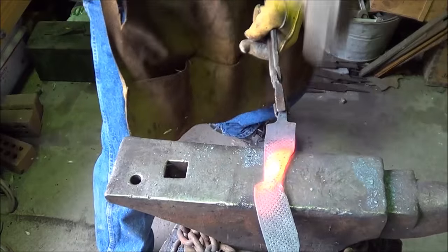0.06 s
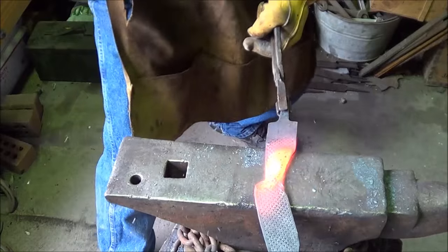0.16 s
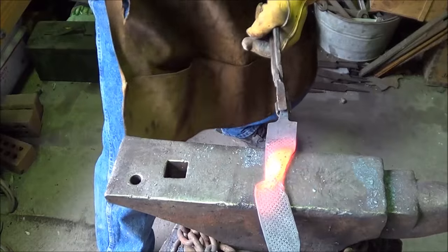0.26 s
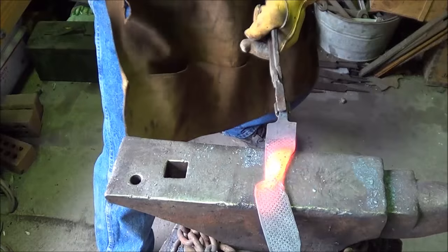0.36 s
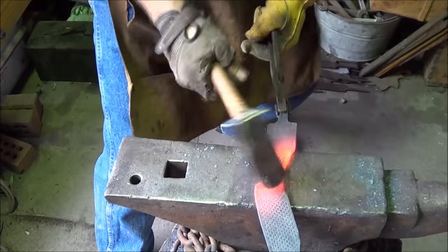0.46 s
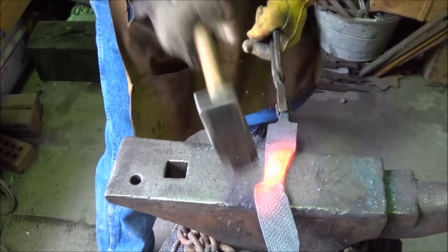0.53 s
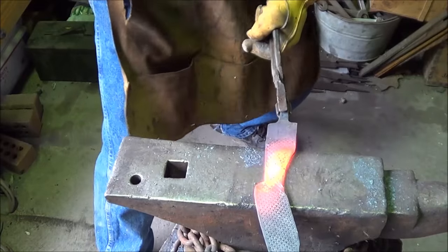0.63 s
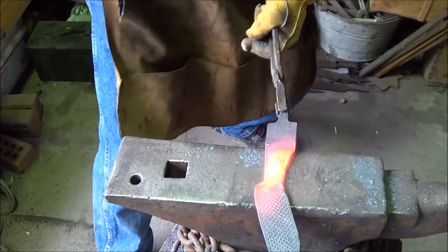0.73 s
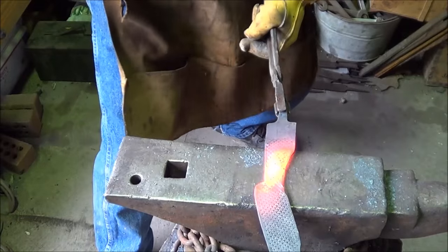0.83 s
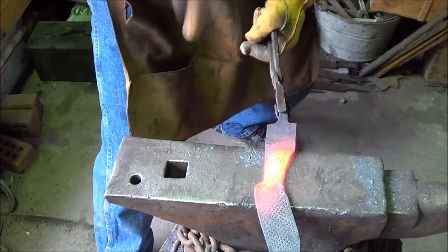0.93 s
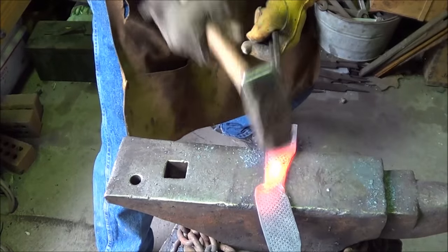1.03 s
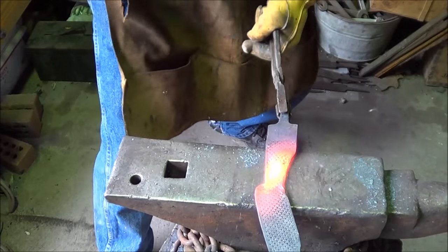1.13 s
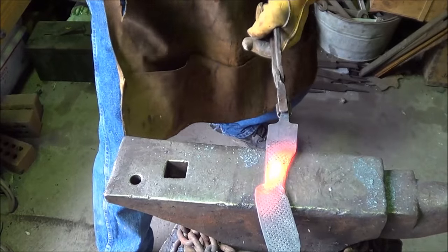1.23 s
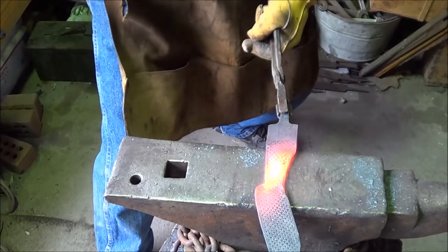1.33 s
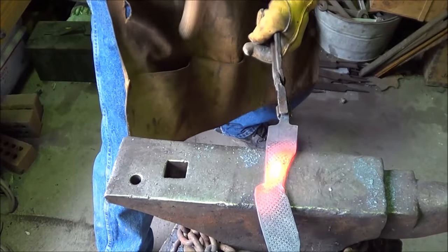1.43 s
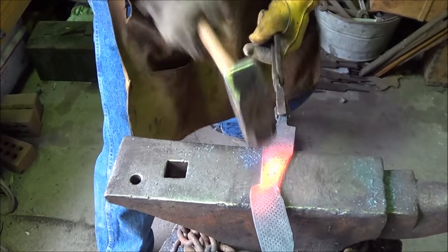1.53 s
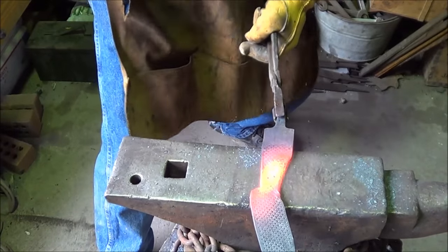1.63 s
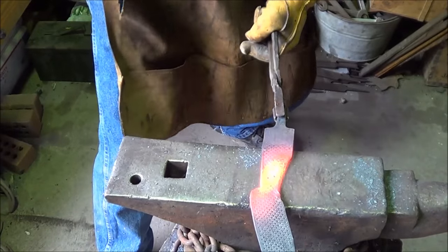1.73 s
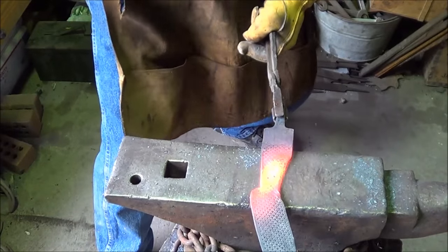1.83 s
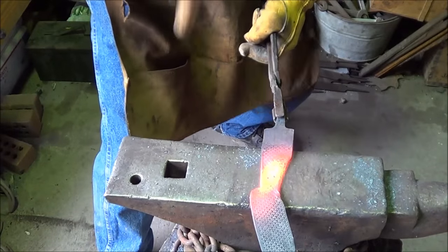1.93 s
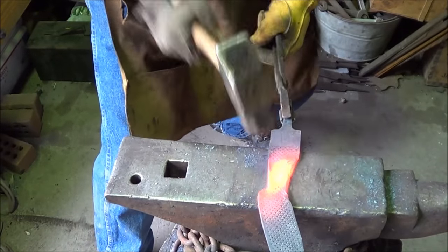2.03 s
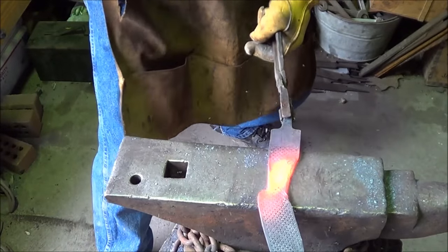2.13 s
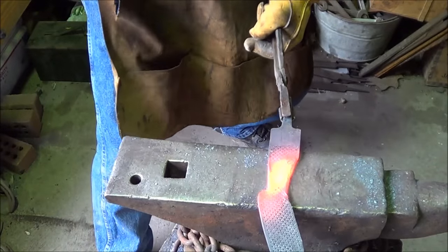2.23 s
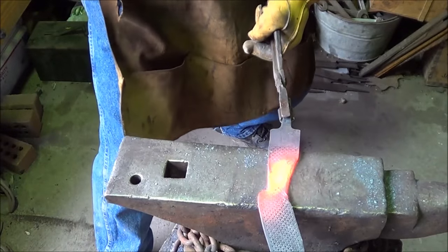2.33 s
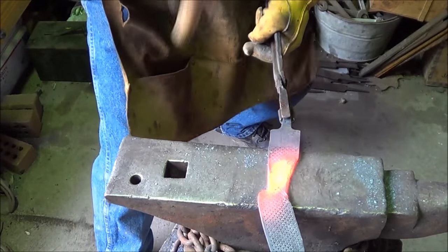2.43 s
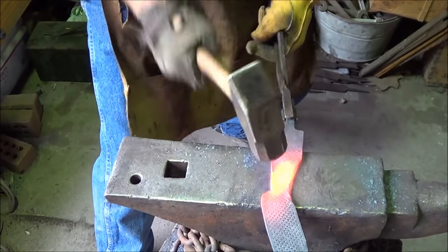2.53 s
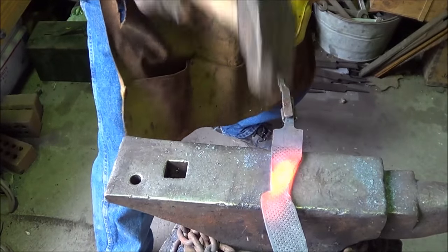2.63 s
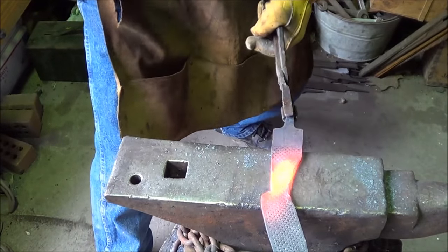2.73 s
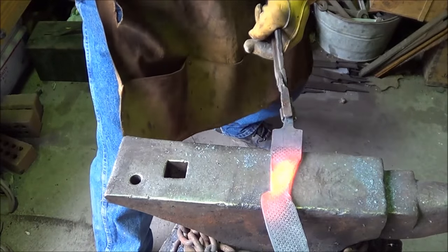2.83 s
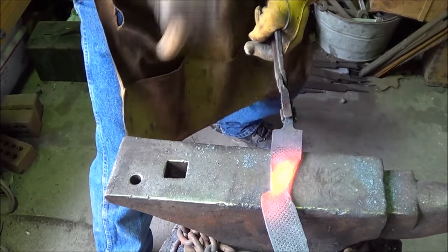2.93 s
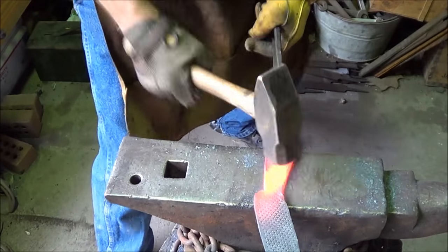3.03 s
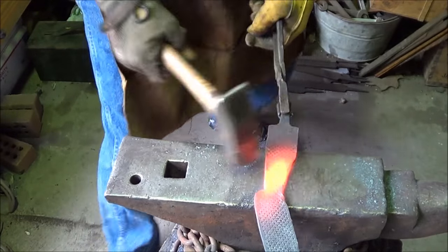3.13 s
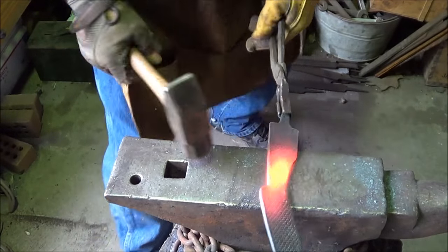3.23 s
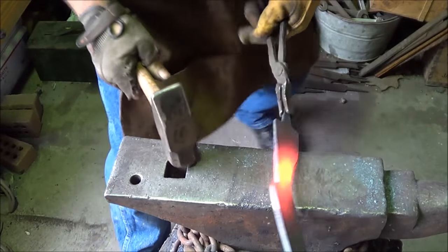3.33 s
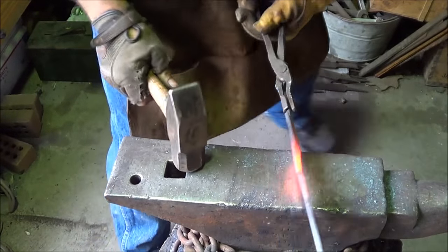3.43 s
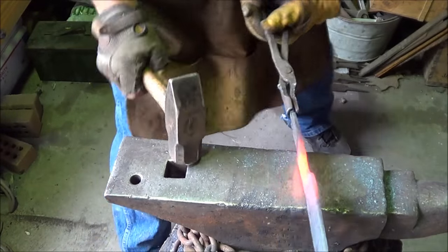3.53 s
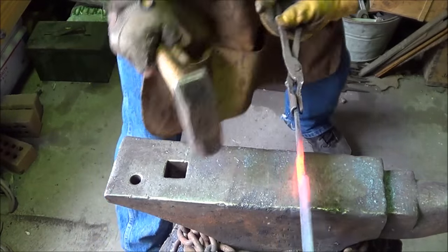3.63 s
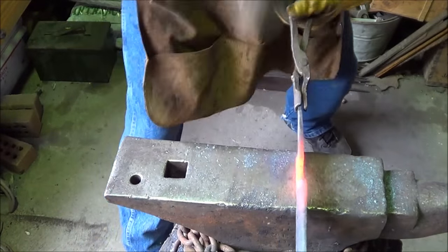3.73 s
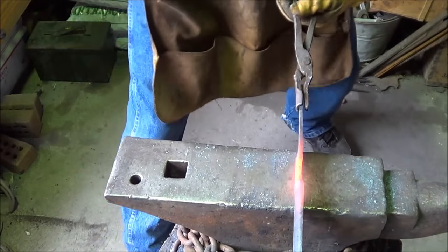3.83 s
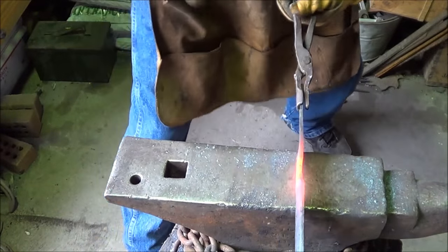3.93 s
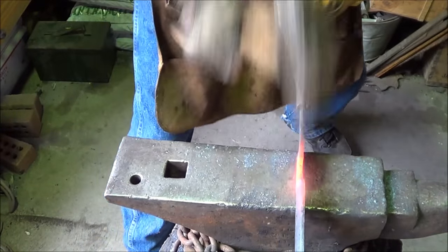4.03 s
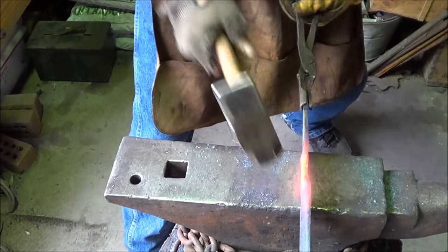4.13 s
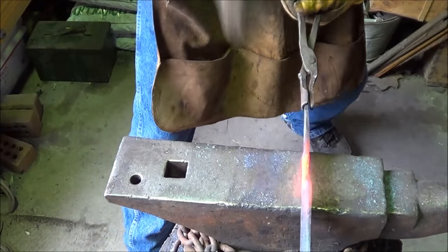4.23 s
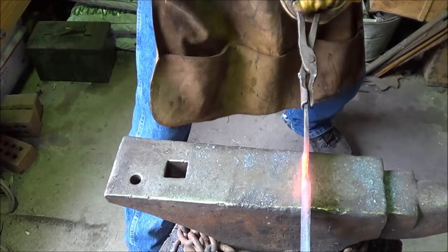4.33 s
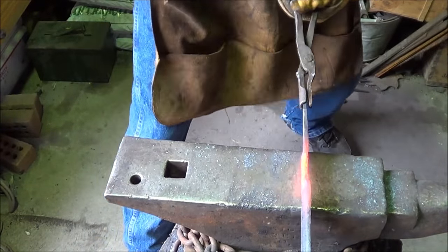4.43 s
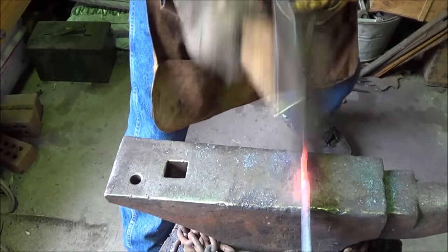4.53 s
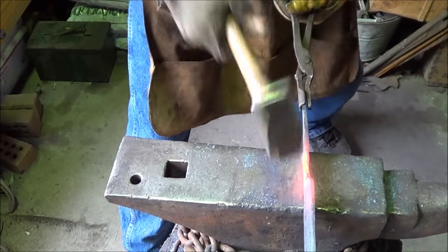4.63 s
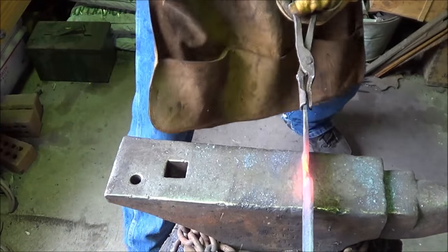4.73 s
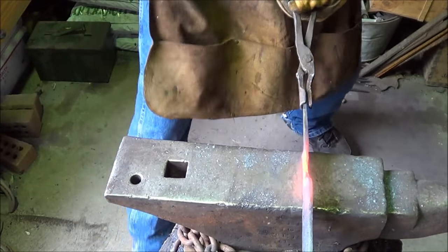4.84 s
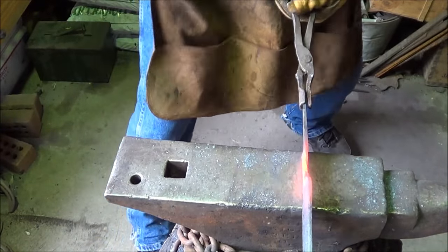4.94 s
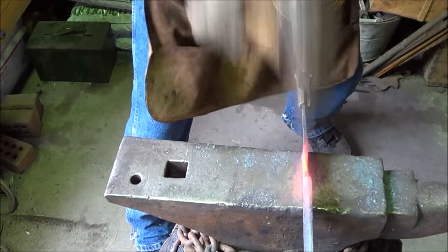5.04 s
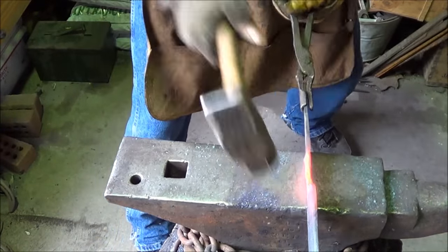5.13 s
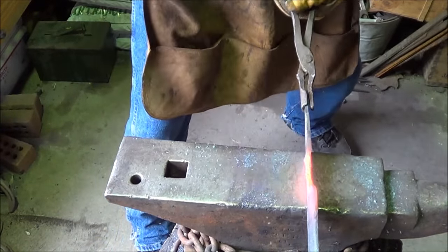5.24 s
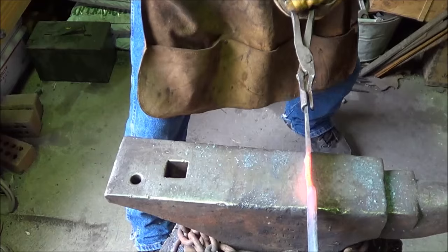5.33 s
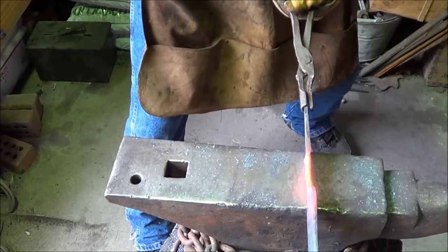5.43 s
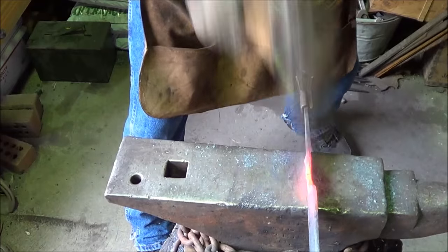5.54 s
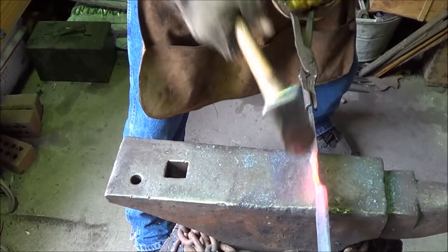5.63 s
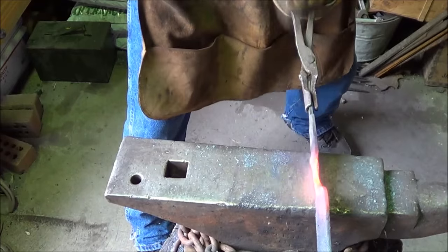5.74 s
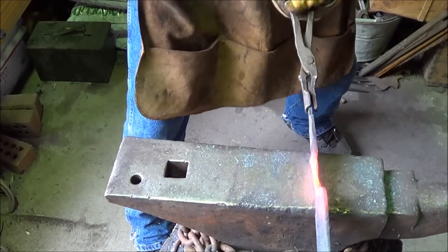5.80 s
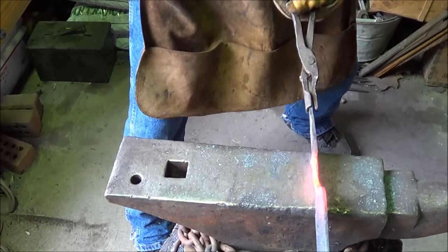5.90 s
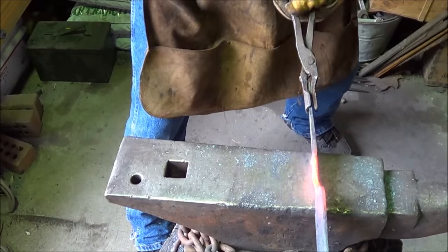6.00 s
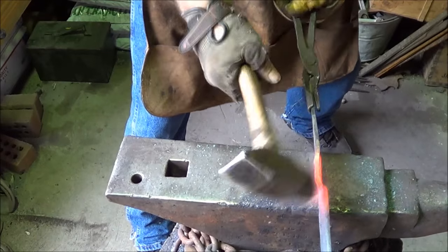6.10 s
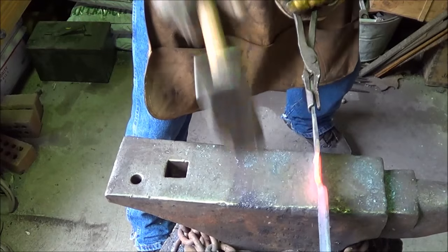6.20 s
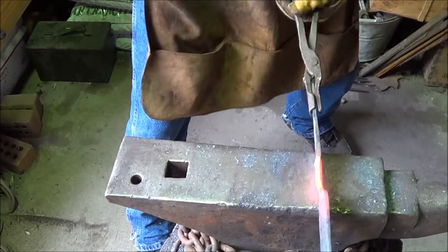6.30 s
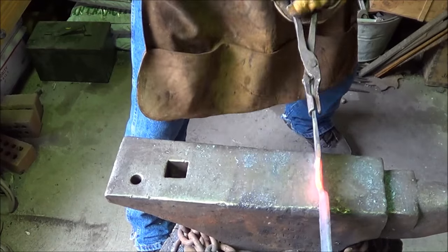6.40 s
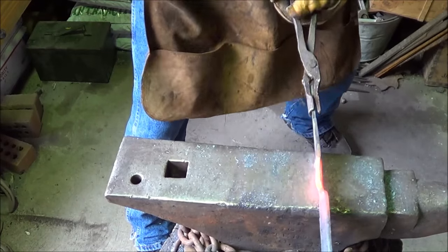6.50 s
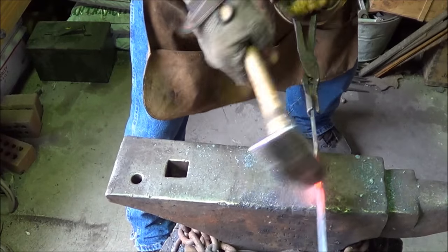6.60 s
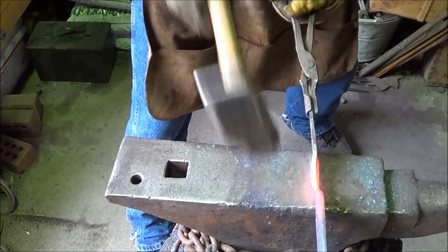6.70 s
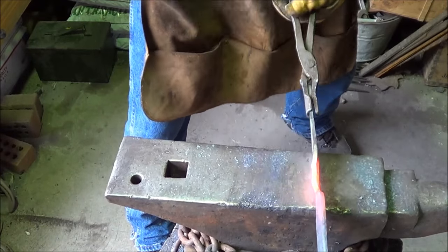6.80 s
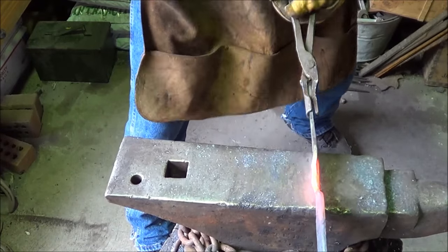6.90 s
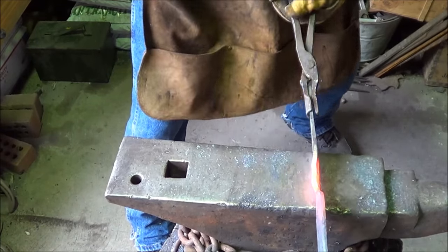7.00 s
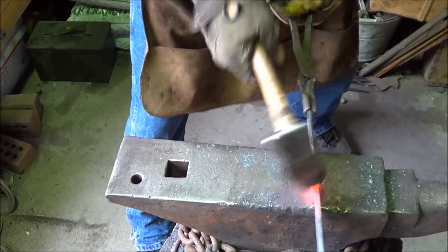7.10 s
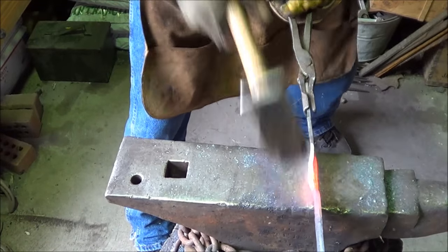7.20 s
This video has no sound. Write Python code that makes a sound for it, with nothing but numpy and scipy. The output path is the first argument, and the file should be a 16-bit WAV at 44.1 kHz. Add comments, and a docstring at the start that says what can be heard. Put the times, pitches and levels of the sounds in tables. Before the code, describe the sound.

A hammer strikes a hot steel bar on an anvil from the very start, close by, about two blows a second. Seven blows land up to about 3 seconds, the first ones thudding, the later ones clanging briefly, with a thin, very high ring from the hammer head that wavers in pitch. Just before 3 seconds a flake of scale ticks on the floor and a shoe scuffs. At 3.2 seconds the bar clinks as it is turned, and around 3.4 the hammer bounces lightly on the bare anvil. From 4.1 to about 7.2 seconds seven more blows land at the same pace, again going from thud to a sharp, short clang. A shoe scuffs softly near 5 seconds. The dull, steady rush of a forge runs underneath throughout, and the small workshop adds a short reverberation to each hit.

```python
"""A smith forges a hot steel bar on an anvil, two blows a second, over the rush of a small workshop's forge.
Seven blows land on the flat; as the bar beds down, the thud gives way to a brief clang, and the hammer
head sings on, bending in pitch as it swings past the microphone. Shoes scuff and scale ticks on the floor.
The bar clinks as it is turned and the hammer bounces on the bare face. Then seven blows land on the edge,
again going from thud to clang. A limiter flattens each blow."""
import sys
import numpy as np
from scipy import signal
from scipy.io import wavfile
from scipy.ndimage import uniform_filter1d, minimum_filter1d

SR = 44100
rng = np.random.default_rng(int(sys.argv[2]) if len(sys.argv) > 2 else 0)


def wav_out(sig):
    """Save sig, one row per channel (or a flat mono array), as 16-bit PCM at SR to the path in sys.argv[1]."""
    wavfile.write(sys.argv[1], SR, np.round(np.clip(np.atleast_2d(sig).T, -1, 1) * 32767).astype(np.int16))


N = 320166
TIME = np.arange(N) / SR
TAIL = TIME[:SR]   # one second for a sound to die away
EDGES = 28 * 2 ** (np.arange(24) / 2.5)   # filter bank, Hz
CENTRES = np.sqrt(EDGES[1:] * EDGES[:-1])


# Hammer on the hot bar. Firmness (0-1) trades thud for clack and ring; the spot hit colours the ring:
# start_s, force_db, firmness, tilt_db_per_octave, overtone_db, hammer_ring_db
BAR_BLOWS = [(0.0, -13.5, 0.28, -5, -6, -23.5), (0.5155, -8.5, 0.14, 0.5, -3, -11.5),
             (1.0334, -10, 0.64, -7.5, 8.5, -7.5), (1.5372, -14.5, .6, -3, -7, -4),
             (2.0396, -14, 0.81, 0, 9, 1.5), (2.5458, -13.5, 0.89, 0, -5, -4),
             (3.049, -17, 0.88, -1.5, -16, -12.5), (4.1181, -20.5, 0.4, -1.5, 1, -24.5),
             (4.608, -18.5, 0.36, 9, -13, -20), (5.1171, -16.5, 0.82, 6, -10, -12.5),
             (5.62, -15, 0.82, 2, 1.5, -19.5), (6.1328, -15, 0.97, -0.5, 2, -19),
             (6.647, -14, 1, 0.5, 3, -18.5), (7.158, -15, 0.94, 0, -8, -8.5)]
# The hammer is set down on the bare face and bounces: start_s, force_db, firmness
HAMMER_TAPS = [(3.3682, -30.5, 0.79), (3.4305, -31, 0.51), (3.464, -43, 0.2)]
# The bar knocks on the anvil as it is turned: start_s, force_db, firmness
TURN_KNOCKS = [(3.2349, -27, 0.38)]

def contacts():
    """Every hit on the anvil: start_s, force_db, firmness, tilt_db_per_octave, overtone_db, kind."""
    blows = [(*row[:-1], pose(row[0])) for row in BAR_BLOWS]
    return blows + [(*row, 0, 0, "bare") for row in HAMMER_TAPS + TURN_KNOCKS]


def pose(s, turn_s=3.7):
    """The bar lies flat until it is turned, then stands on edge."""
    return "flat" if s < turn_s else "edge"


# Tone of hammer, bar, anvil and stand colliding: freq_hz, density_db
IMPACT_TONE = [(40, -45), (80, -6), (130, -7), (200, 0), (310, 0.5), (530, 0), (780, -5.5), (1200, -4),
               (2000, -9), (3000, -12.5), (5000, -12), (8000, -6), (11500, -6.5), (15500, -30)]
# Where each part of the hit sits: boom_hz, thud_hz, knock_hz, clack_hz, crack_hz
HIT_ZONES = [70, 220, 1000, 1730, 7000]
# EQ of a loose hit, by kind of contact: boom_db, thud_db, knock_db, clack_db, crack_db
LOOSE_EQ = {"flat": (0, -1.5, -4, -7, -0.5), "edge": (5.5, 7, 2, -5, -2), "bare": (-15, 4.5, -8, 5, -12.5)}
# What full firmness adds: boom_db, thud_db, knock_db, clack_db, crack_db
FIRM_EQ = (-3, -6.5, -1, 8.5, -0.5)
# The first burst over the wash of the shop: freq_hz, level_db
BURST_OVER_WASH = [(200, 2), (1100, 11.5), (3500, 6.5), (11000, 14.5)]
# Trim on that burst, by kind of contact: gain_db
BURST_TRIM = {"flat": -1, "edge": 0.5, "bare": 7}

def impacts(contact_s=0.0015, thump_cycles=1.6, gain_db=19.0, heavy_db=-13.5, stand_hz=226.0):
    """Each contact is a short broadband burst, longest in the bass, followed by the wash of the shop."""
    out, noise, hits = np.zeros((2, N)), noise_bands(2 * SR), contacts()
    burst = np.array([from_db(at_hz(BURST_OVER_WASH, hz)) * np.exp(-TAIL / (contact_s + thump_cycles / hz))
                      for hz in CENTRES])
    wash = np.array([shop_decay(hz) for hz in CENTRES])
    envelopes = {kind: np.array([normalise(row) for row in from_db(trim_db) * burst + wash])
                 for kind, trim_db in BURST_TRIM.items()}
    for (s, force_db, firmness, *_, kind), offset in zip(hits, rng.integers(0, SR, len(hits))):
        zone_db = force_db + np.array(LOOSE_EQ[kind]) + firmness * np.array(FIRM_EQ)
        # a light touch hardly shakes the stand, so its bass thins out
        thin_db = 0.6 * max(heavy_db - zone_db[1], 0) * np.maximum(np.log2(stand_hz / CENTRES), 0)
        struck_db = np.interp(np.log(CENTRES), np.log(HIT_ZONES), zone_db)
        gain = from_db(gain_db + at_hz(IMPACT_TONE, CENTRES) + struck_db - thin_db)
        add(out, s, np.einsum("bt,bct->ct", gain[:, None] * envelopes[kind], noise[:, :, offset:offset + SR]))
    return out


# The anvil's modes: pitch_hz, level_db, base_t60_s
ANVIL_MODES = [(1636, -17, .2), (1810, -14, .25), (1842, -15, .3), (2109, 2, .17), (2150, -9, .1),
               (2690, 0, .2), (3751, 2, .26), (4543, -12, .24), (4719, 3, .25), (5655, -13, .25),
               (6312, -6, .18), (6440, -2, .2), (7299, -8, .22), (7515, -9, .2), (8486, -1, .23),
               (8957, -14, .2), (10357, -14, .25), (12620, -1, .25), (12941, -15, .25)]
# EQ points of the clang: freq_hz
CLANG_ZONES = [1830, 2110, 2690, 3750, 4718, 8484, 12620]
# How hard a firm hit wakes the anvil, by kind of contact: gain_db at each EQ point
CLANG_EQ = {"flat": (2.5, 8, -5.5, -2, -5.5, 4.5, 8), "edge": (8.5, 6.5, -22, -2.5, 1, -8.5, -18),
            "bare": (13, 12, 5.5, -1, 7, -25, -7)}
# Ring length left by each kind of contact: share of base_t60_s
CLANG_LENGTH = {"flat": 1, "edge": 0.99, "bare": 0.73}

def clang(kind, pivot_hz=2140.0, overtone_hz=4718, overtone_octaves=.15, cushion_db=20.5):
    """The anvil's modes under one kind of contact: the kind decides which speak, firmness how loudly."""
    out = 0
    hits = [row[:-1] for row in contacts() if row[-1] == kind]
    times, force_db, firmness, tilt_db, overtone_db = np.transpose(hits)
    struck_db = force_db - cushion_db * (1 - firmness)   # a loose bar cushions the blow
    for hz, mode_db, t60 in ANVIL_MODES:
        zone_db = np.interp(np.log(hz), np.log(CLANG_ZONES), CLANG_EQ[kind])
        near_overtone = np.exp(-(np.log2(hz / overtone_hz) / overtone_octaves) ** 2)
        spot_db = tilt_db * np.log2(hz / pivot_hz) + overtone_db * near_overtone
        out = out + ring(hz, t60 * CLANG_LENGTH[kind], times, mode_db + zone_db + spot_db + struck_db)
    return out


def anvil(mute_db_per_s=65):
    """The anvil clangs at every contact; the hammer coming to rest mutes the ring of the bare face."""
    mute = from_db(-mute_db_per_s * np.maximum(TIME - HAMMER_TAPS[-1][0], 0))
    return clang("flat") + clang("edge") + mute * clang("bare")


# Lift after each kind of contact: curve_exponent (higher tops out later)
LIFT_CURVE = {"flat": 1.9, "edge": 2.45, "bare": 0.97}

def hammer_height(last_stroke_s=0.49, blow_lift_m=.4, tap_lift_m=.03):
    """The head rises, hangs and comes down at full speed: high before a blow, barely before a tap."""
    blows = [(s, pose(s), blow_lift_m) for s, *_ in BAR_BLOWS]
    landings = sorted(blows + [(s, "bare", tap_lift_m) for s, *_ in HAMMER_TAPS])
    landings.append((landings[-1][0] + last_stroke_s, "edge", blow_lift_m))
    height = np.zeros(N)
    for (s, kind, _), (end, _, lift) in zip(landings, landings[1:]):
        progress = np.clip((TIME - s) / (end - s), 0, 1)
        height += lift * np.sin(np.pi * progress ** LIFT_CURVE[kind])
    return height


def hammer(pitch_hz=11003, t60_s=0.7, mic_height_m=.12, mic_offset_m=.05, echo_db=-7.5, wet_db=-4.5):
    """The head rings with one high mode that swells and bends in pitch as it passes the microphone."""
    envelope, height = np.zeros(N), hammer_height()
    for s, *_, ring_db in BAR_BLOWS:
        add(envelope, s, from_db(ring_db - 1.5 - 60 * TAIL / t60_s))
    rest_m, sound_m_per_s = np.hypot(mic_height_m, mic_offset_m), 343
    omega = 2 * np.pi * pitch_hz
    # the straight path and the one mirrored in the anvil face shift in opposite ways and beat
    paths = [np.hypot(mic_height_m + side * height, mic_offset_m) for side in (-1, 1)]
    direct, echo = [envelope * rest_m / r * np.sin(omega * (TIME - r / sound_m_per_s)) for r in paths]
    # ceiling, walls and floor each get their own Doppler shift, which smears the wash
    spread = sum(envelope * np.sin(omega * (TIME + facing * height / sound_m_per_s) + phase)
                 for facing, phase in zip(np.linspace(-1, 1, 5), rng.uniform(0, 2 * np.pi, 5)))
    wash = signal.fftconvolve(spread[None], shop_response(pitch_hz), axes=1)[:, :N]
    return direct + from_db(echo_db) * echo + from_db(wet_db) * wash * direct.std() / wash.std()


# The bar's modes: pitch_hz, level_db, undamped_t60_s
BAR_MODES = [(4565, -7, .2), (5120, -7, .08), (5665, 0, .17), (6080, -7, .12), (6456, -1, .18)]

def bar(clink_db=2.5, ring_share=0.58):
    """The cold end of the bar clinks, damped by the tongs."""
    times, force_db, _ = np.transpose(TURN_KNOCKS)
    return sum(ring(hz, t60 * ring_share, times, force_db + clink_db + mode_db)
               for hz, mode_db, t60 in BAR_MODES)


# Shoes on the gritty floor: start_s (at the peak), level_db, tilt_db_per_octave
SHOE_SCUFFS = [(2.875, -29, 2.5), (3.74, -52, 6), (3.86, -45.5, 3), (4.945, -23.5, -3)]
# Flakes of scale and grit landing: start_s, level_db, tilt_db_per_octave
SCALE_TICKS = [(0.9592, -40, 12), (2.8515, -17, -2.5), (3.8467, -28.5, 6.5)]

def floor_sounds():
    """Shoes scuff slowly; falling scale ticks sharply."""
    shoes = grit(SHOE_SCUFFS, rise_s=0.038, fall_s=0.04, grain_db=0.5, wet_db=-14.5)
    return shoes + grit(SCALE_TICKS, rise_s=.0007, fall_s=0.0018, grain_db=4.0, wet_db=-12.0)


# Tone of the grit: freq_hz, density_db
GRIT_TONE = [(100, -29), (600, -10), (1300, -4), (2200, -1.5), (4000, -13), (8000, -3.5), (12000, -11),
             (16000, -35)]

def grit(events, rise_s, fall_s, grain_db, wet_db, lead_s=.2, grain_samples=50):
    """Grit crunches in short grainy swells that the shop carries on."""
    out, noise = np.zeros((2, N)), noise_bands(SR)
    swell = np.exp(-np.maximum((lead_s - TAIL) / rise_s, (TAIL - lead_s) / fall_s))
    for s, level_db, tilt_db in events:
        tone_db = at_hz(GRIT_TONE, CENTRES) + tilt_db * np.log2(CENTRES / 2000)
        hiss = np.tensordot(from_db(tone_db), noise, 1)
        grains = np.repeat(rng.standard_normal(SR // grain_samples + 1), grain_samples)[:SR]
        add(out, s - lead_s, from_db(level_db + grain_db * grains) * hiss / hiss.std() * swell)
    walls = shop_response(4000)
    wash = signal.fftconvolve(out, walls / np.linalg.norm(walls[0]), axes=1)[:, :N]
    return out + from_db(wet_db) * wash


# Tone of the forge: freq_hz, density_db
FORGE_TONE = [(15, -41), (25, -9.5), (84, -10.5), (123, -2.5), (263, -21.5), (309, 5.5), (394, -3),
              (591, -5), (641, -4), (988, -4.5), (1260, -21.5), (1440, -13.5), (4370, -26.5), (9070, -26.5),
              (16000, -40.5)]
# Its slow fader ride: time_s, level_db
FORGE_LEVEL = [(0, -37), (1.5, -38), (2.8, -40.5), (4, -41), (5.5, -36.5), (7.26, -38)]

def forge():
    """A dull, steady rush fills the shop."""
    rush = np.tensordot(from_db(at_hz(FORGE_TONE, CENTRES)), noise_bands(N), 1)
    return rush / rush.std() * from_db(np.interp(TIME, *np.transpose(FORGE_LEVEL)))


# Reverb time of the shop: freq_hz, t60_s
SHOP_REVERB = [(60, 0.39), (300, 0.5), (1000, 0.42), (3000, 0.47), (8000, 0.37), (15000, 0.18)]

def shop_decay(hz, build_s=0.004):
    """Reflections gather within milliseconds and die away."""
    return from_db(-60 * TAIL / at_hz(SHOP_REVERB, hz)) * (1 - np.exp(-TAIL / build_s))


def shop_response(hz):
    """Dense stereo reflections with the decay and width the shop has at this pitch."""
    return stereo(*rng.standard_normal((2, SR)), hz) * shop_decay(hz)


# Stereo width: freq_hz, side_over_mid_db
STEREO_WIDTH = [(40, -18.5), (120, -17), (300, -14), (1000, -11), (4000, -7.5), (8000, -8.5), (11000, -15)]
# Stereo lean: freq_hz, left_over_right_db
STEREO_LEAN = [(40, -3), (150, -0.5), (400, -2.5), (1200, -1.5), (4000, -1.2), (9000, -1)]

def stereo(mid, side, hz):
    """Left and right with the width and lean that belong to this pitch."""
    sign = np.array([[1], [-1]])
    wide = mid + sign * side * from_db(at_hz(STEREO_WIDTH, hz))
    return wide * from_db(sign * at_hz(STEREO_LEAN, hz) / 2)


def ring(hz, t60, times, levels_db, rise_s=0.012, wash_db=-11):
    """One struck mode with its wash; the two meet in a new phase on every blow, so the tail flutters."""
    out = np.zeros((2, N))
    direct = np.sin(2 * np.pi * hz * TAIL) * from_db(-60 * TAIL / t60) * (1 - np.exp(-TAIL / rise_s))
    reflections = signal.fftconvolve(direct[None], shop_response(hz), axes=1)[:, :SR]
    wash = from_db(wash_db) * normalise(reflections)
    for s, level_db, lag in zip(times, levels_db, rng.random(len(times)) * SR / hz):
        add(out, s, from_db(level_db) * normalise(normalise(direct) + np.roll(wash, int(lag), axis=1)))
    return out


def noise_bands(size):
    """Stereo noise of even density, split into bands."""
    white, bands = rng.standard_normal((2, 2, size)), []
    for k, hz in enumerate(CENTRES):
        bandpass = signal.butter(2, EDGES[k:k + 2], "band", fs=SR, output="sos")
        bands.append(stereo(*signal.sosfilt(bandpass, white[k % 2]), hz))
    return np.array(bands)


def from_db(db):
    """Decibels to gain."""
    return 10 ** (np.asarray(db) / 20)


def at_hz(points, hz):
    """Read a table on a log-frequency axis."""
    points = np.array(points)
    return np.interp(np.log(hz), np.log(points[:, 0]), points[:, 1])


def normalise(x):
    """Scale a burst to the energy of a tenth of a second at rms 1."""
    return x / np.sqrt(np.mean(np.sum(x ** 2, axis=-1)) * 10 / SR + 1e-20)


def add(out, s, sound):
    """Mix a sound in at time s."""
    i = max(round(s * SR), 0)
    out[..., i:i + sound.shape[-1]] += sound[..., :N - i]


def gain_cut(x, ceiling_db, release_db_per_s):
    """Decibels by which the peaks exceed a ceiling, let go at a steady rate."""
    over = np.maximum(20 * np.log10(np.abs(x).max(axis=0) + 1e-9) - ceiling_db, 0)
    return np.maximum.accumulate(over + release_db_per_s * TIME) - release_db_per_s * TIME


def scene():
    """Blows, ringing steel, footwork and the forge."""
    return impacts() + anvil() + bar() + hammer() + floor_sounds() + forge()


def record(dry, overload_db=12.0, attack_s=.0025, cutoff_hz=16300):
    """Cracks saturate, gain control holds each blow level, a limiter catches the peaks, the top is cut."""
    saturated = from_db(overload_db) * np.tanh(dry / from_db(overload_db))
    pole = np.exp(-1 / (attack_s * SR))
    hold_db = gain_cut(saturated, ceiling_db=-3.3, release_db_per_s=241.0)
    held = saturated * from_db(-signal.lfilter([1 - pole], [1, -pole], hold_db))
    peak_db = gain_cut(held, ceiling_db=-1.0, release_db_per_s=2491.0)
    lookahead_db = minimum_filter1d(-peak_db, size=17)
    limited = held * from_db(uniform_filter1d(lookahead_db, size=17))
    return signal.sosfilt(signal.ellip(10, .2, 80, cutoff_hz, fs=SR, output="sos"), limited)


dry = scene()
out = record(dry)
wav_out(out)
```